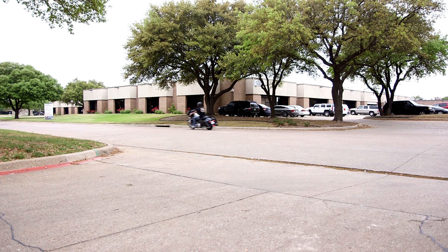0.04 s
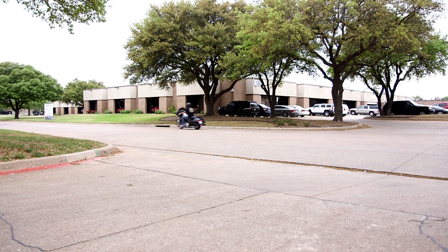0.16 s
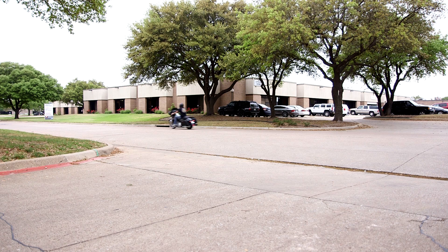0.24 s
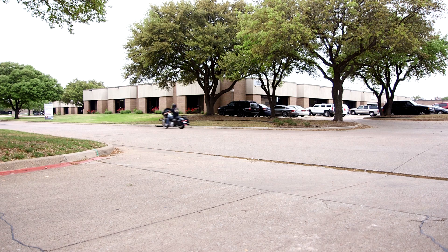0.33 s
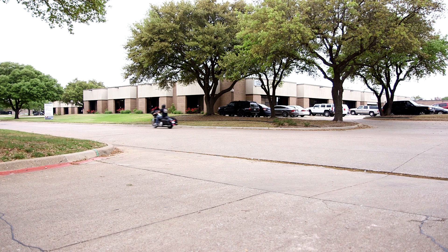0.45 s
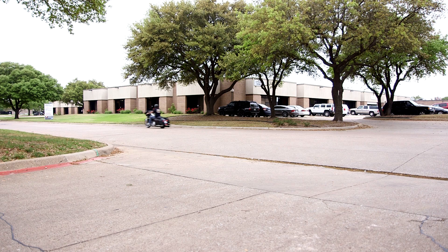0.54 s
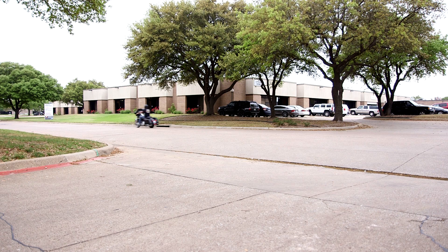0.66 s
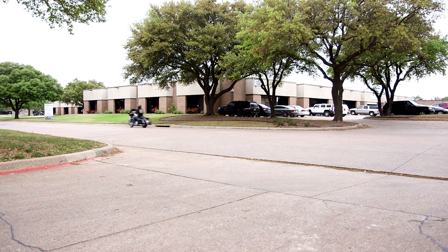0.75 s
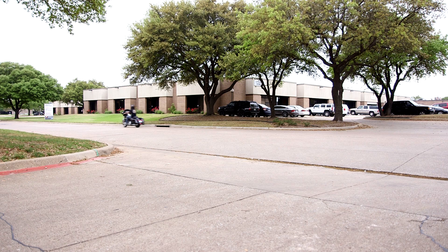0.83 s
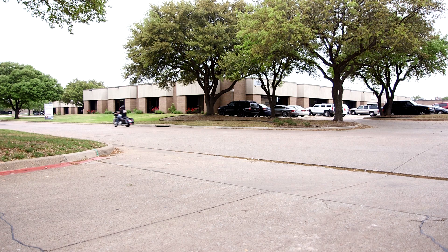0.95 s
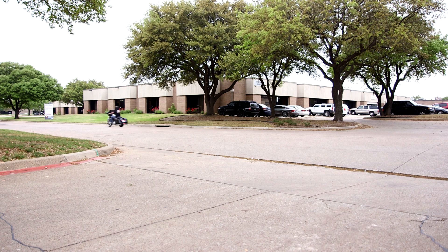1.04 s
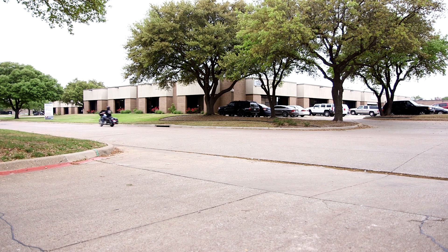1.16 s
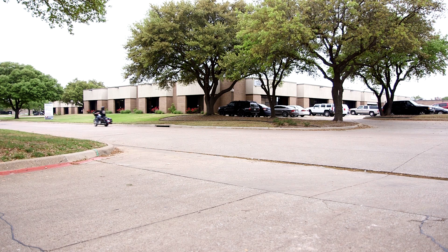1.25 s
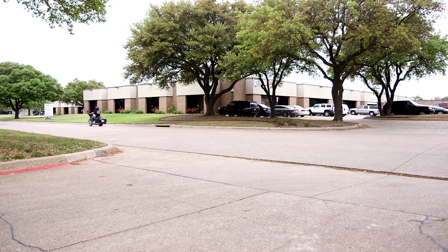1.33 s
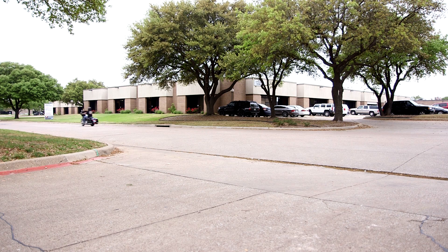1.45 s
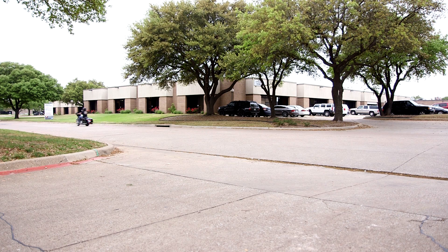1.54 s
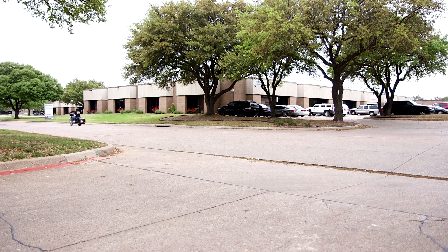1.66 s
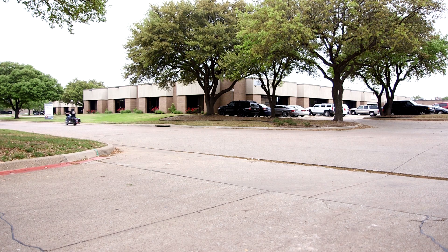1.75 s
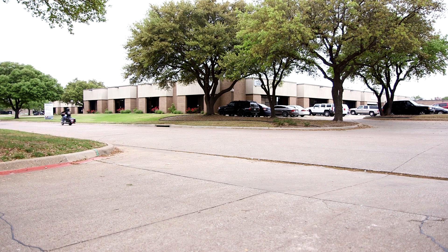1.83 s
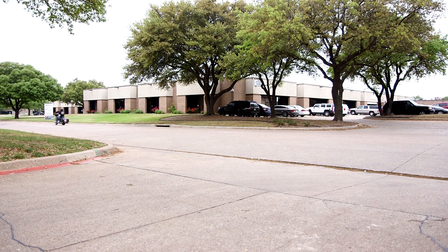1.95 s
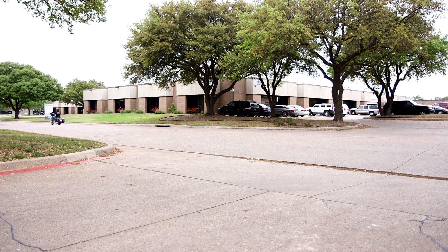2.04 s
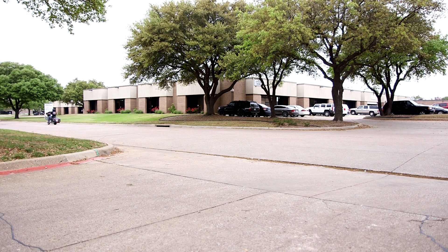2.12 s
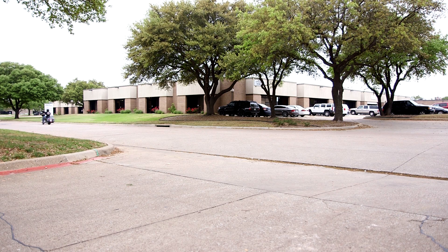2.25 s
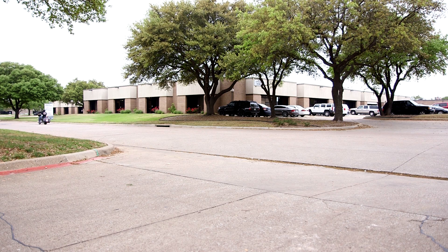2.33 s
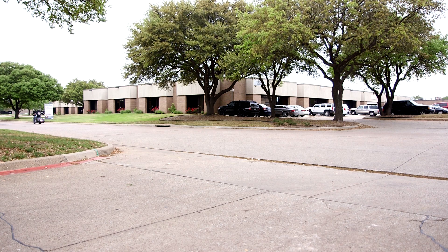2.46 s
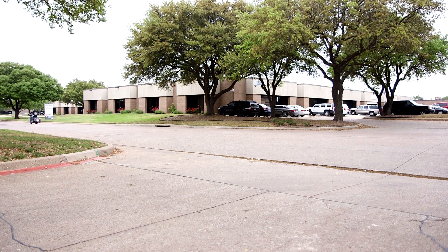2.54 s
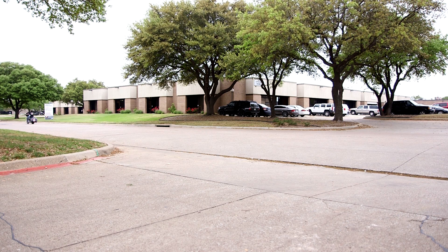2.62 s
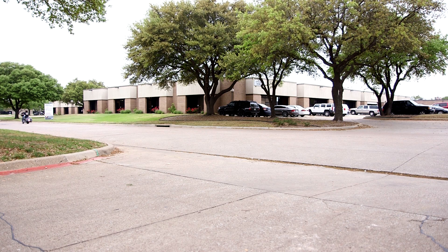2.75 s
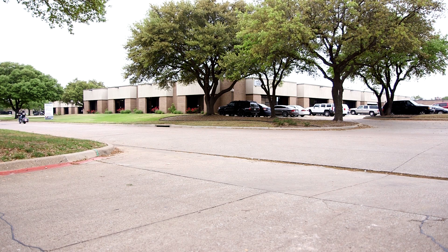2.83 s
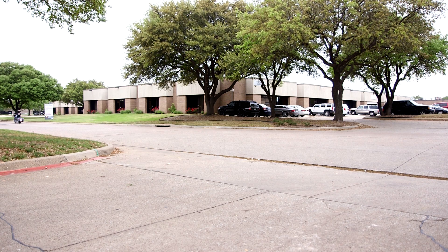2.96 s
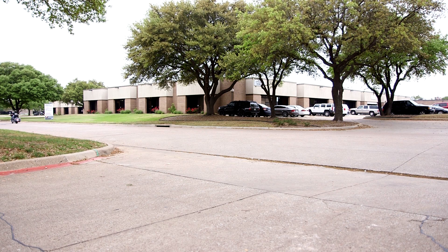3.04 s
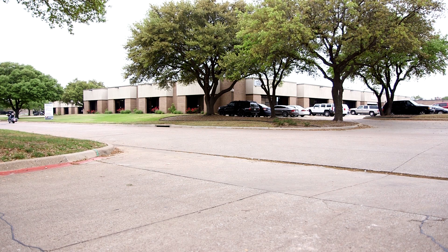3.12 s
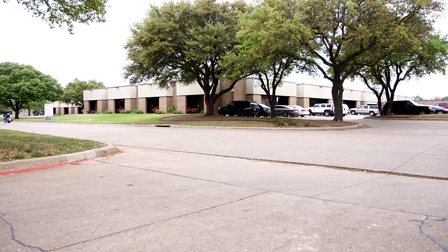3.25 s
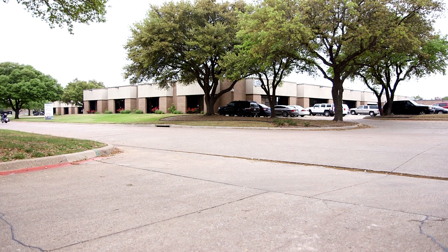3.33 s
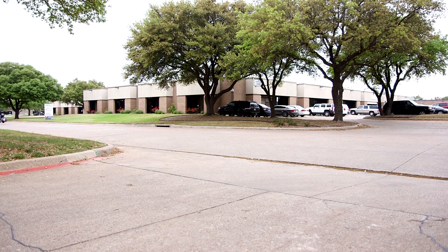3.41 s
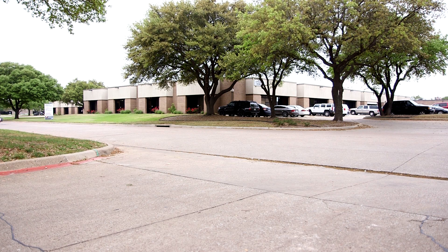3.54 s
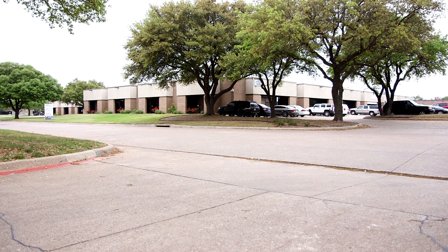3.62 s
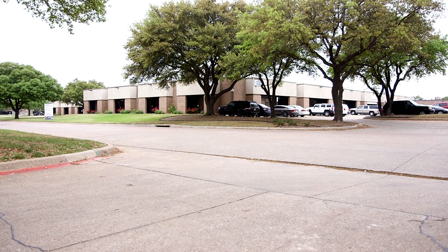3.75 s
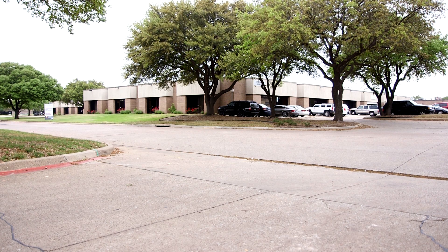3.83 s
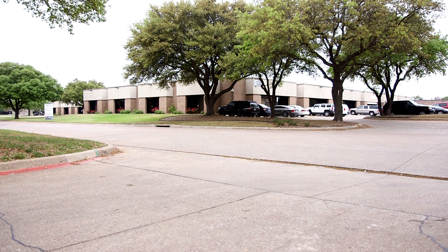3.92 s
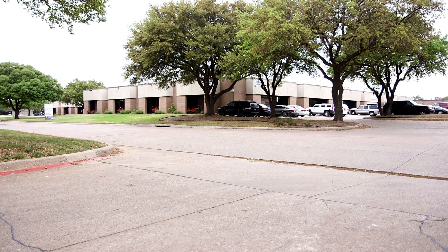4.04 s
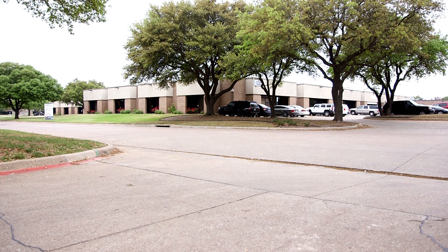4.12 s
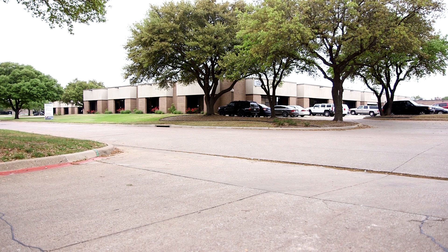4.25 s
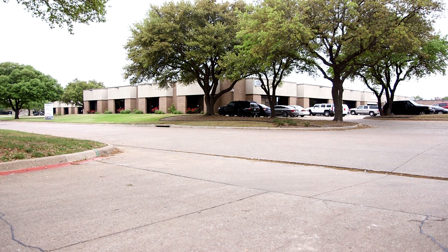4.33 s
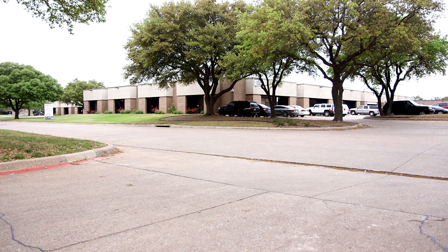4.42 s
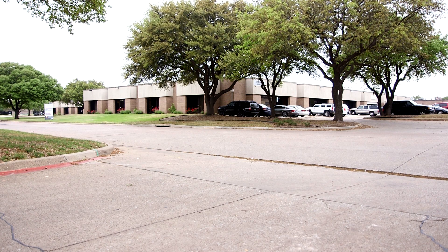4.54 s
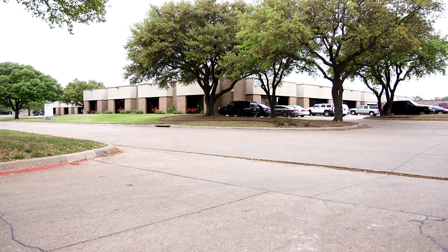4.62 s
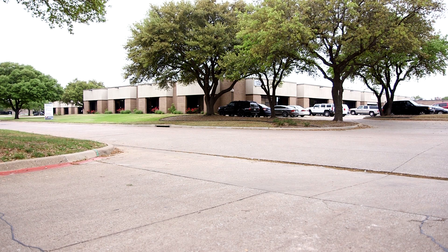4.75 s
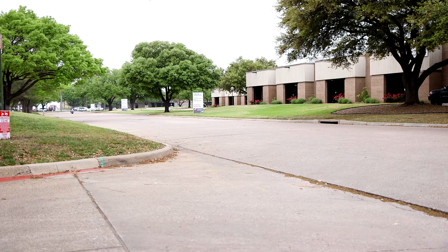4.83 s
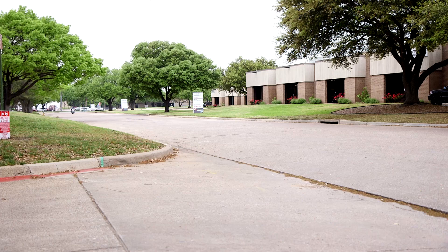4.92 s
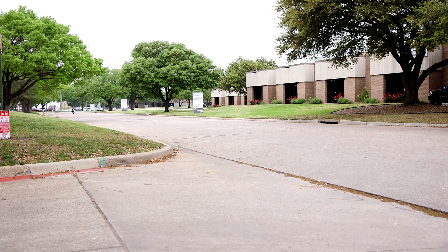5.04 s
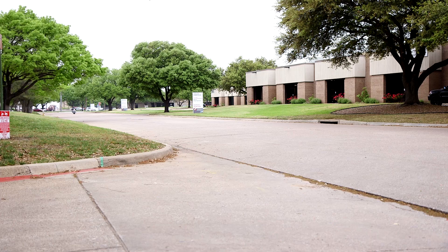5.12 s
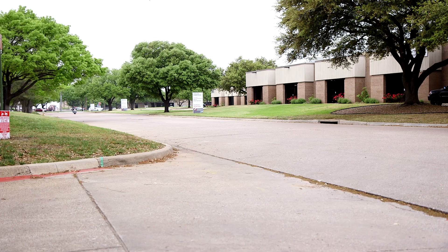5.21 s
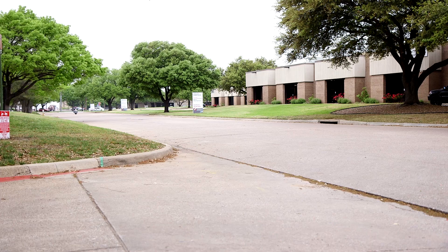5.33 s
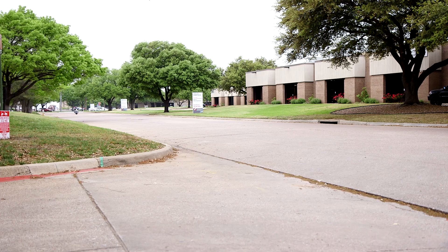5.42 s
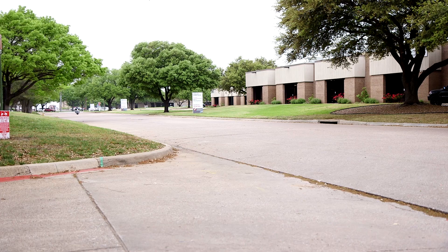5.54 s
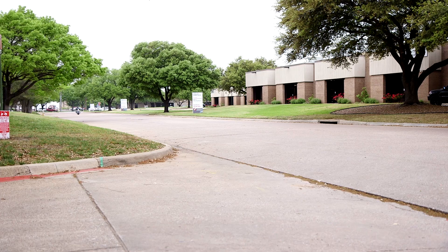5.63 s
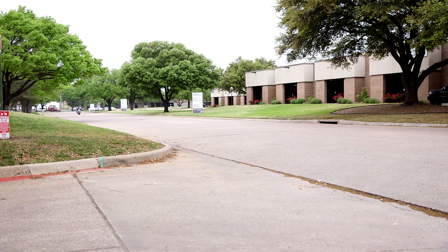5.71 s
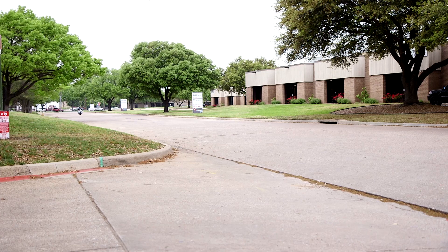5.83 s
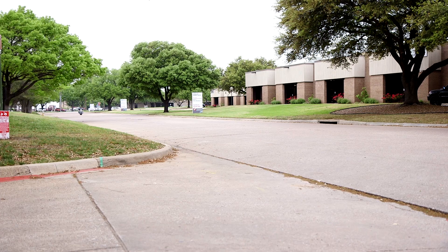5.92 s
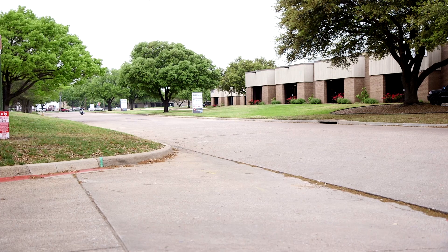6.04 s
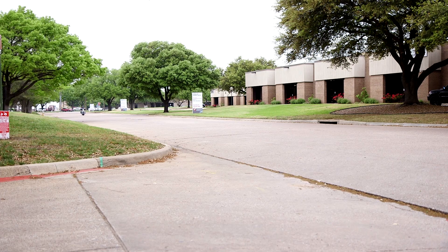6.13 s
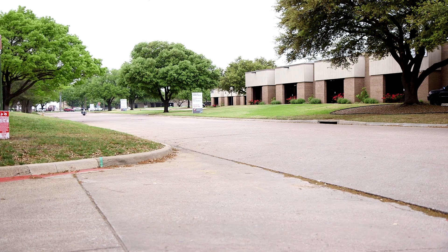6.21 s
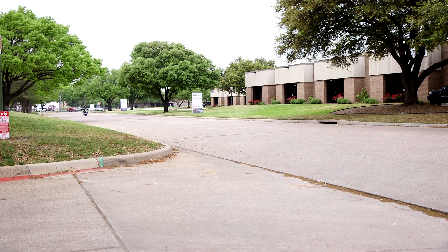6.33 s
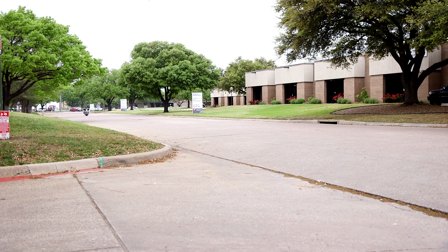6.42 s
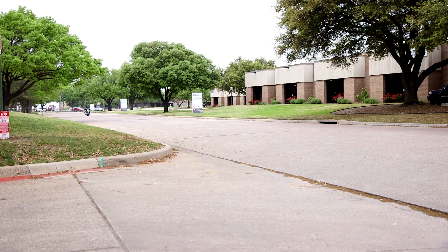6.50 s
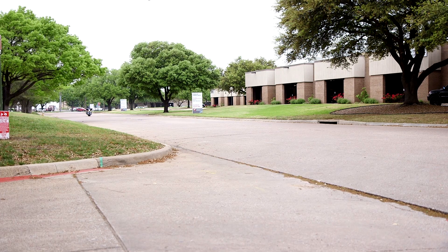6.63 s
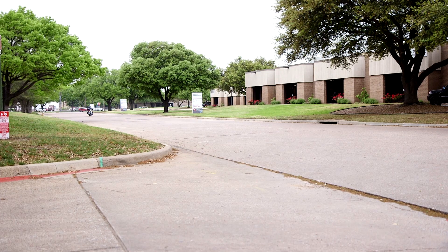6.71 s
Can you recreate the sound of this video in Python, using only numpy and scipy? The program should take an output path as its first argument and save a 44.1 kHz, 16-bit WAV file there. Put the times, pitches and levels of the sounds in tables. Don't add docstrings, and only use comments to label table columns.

```python
import sys
import numpy as np
from scipy import signal
from scipy.fft import rfft, irfft
from scipy.io import wavfile
from scipy.ndimage import uniform_filter1d

SR = 44100
rng = np.random.default_rng(int(sys.argv[2]) if len(sys.argv) > 2 else 0)


def linear_from_db(decibels):
    return 10 ** (np.asarray(decibels, float) / 20)


def output_pcm(signal):
    pcm = np.clip(np.atleast_2d(signal).T, -1, 1) * 32767
    wavfile.write(sys.argv[1], SR, np.round(pcm).astype(np.int16))


N = 298557
STEP = 8
SECOND_FIRING = 315 / 720

# (time [s], second over first firing [0-1], dulling [dB/octave])
TWIN = [(0, 0.27, 1.5), (1.5, 0.51, 3), (2, 0.6, 0), (3.8, 0.48, -0.5), (4.2, 0.64, -0.5), (4.9, 0.4, -0.5),
        (5.1, 0.04, 2), (6, 1, 4.5), (6.77, 0.5, 3.5)]


def unit(x):
    return x / np.sqrt(np.mean(x ** 2) + 1e-20)


def in_time(rows):
    s, *columns = np.transpose(rows)
    return [np.interp(np.arange(N) / SR, s, c) for c in columns]


def at_hz(points, hz):
    points_hz, points_db = np.array(points)[:, 0], np.array(points)[:, 1]
    return np.interp(np.log(hz), np.log(points_hz), points_db)


def wander(hz):
    knots = rng.standard_normal(int(N / SR * hz) + 2)
    at_knot = np.arange(0, N, STEP) / SR * hz
    return uniform_filter1d(np.interp(at_knot, np.arange(len(knots)), knots), size=200)


def even(x):
    power = uniform_filter1d(uniform_filter1d(x ** 2, size=5000), size=5000)
    return x / np.sqrt(power + 1e-20)


def resonate(x, modes):
    out = 0
    for k, (hz, width_hz, db) in enumerate(modes):
        r = np.exp(-np.pi * width_hz / SR)
        poles = [1, -2 * r * np.cos(2 * np.pi * hz / SR), r * r]
        zeros = [(1 - r * r) / 2, 0, (r * r - 1) / 2]
        out = out + (-1) ** k * linear_from_db(db) * signal.lfilter(zeros, poles, x + 1e-18)
    return out


def cut(x, hz, kind, order):
    return signal.sosfilt(signal.butter(order, min(hz, .45 * SR), kind, fs=SR, output="sos"), x)


def decay(x, t60_s):
    return signal.lfilter([1], [1, -linear_from_db(-60 / (t60_s * SR))], x)


def echoes(x, wet_db, dull_hz):
    t60_s, gap_s = 0.64, .012
    s = np.arange(SR) / SR
    tail = rng.standard_normal(SR) * linear_from_db(-60 * s / t60_s) * (s > gap_s)
    tail = cut(tail / np.sqrt(np.sum(tail ** 2)), dull_hz, "low", order=1)
    return x + linear_from_db(wet_db) * signal.fftconvolve(x, tail)[:N]


def firings(cycle, lag):
    turns = np.arange(-1, int(cycle[-1]) + 1)[:, None] + [0, SECOND_FIRING] + lag
    at = np.interp(turns.ravel(), cycle, np.arange(N), left=-1, right=-1).astype(int)
    return at[at >= 0]


def clicks(at, sizes):
    out = np.zeros(N)
    out[at] = sizes
    return out


def strengths(cycle, mouth_db):
    # (time [s], peak [dB])
    hard = [(0.0618, -32), (0.1301, -24.5), (0.178, -21), (0.2034, -21), (0.2249, -20), (0.2713, -14),
            (0.3177, -17.5), (0.4529, -26), (1.7509, -26), (1.8023, -30), (1.914, -24), (1.9679, -32),
            (2.0737, -35), (2.3346, -26), (2.3855, -24), (2.4139, -25), (2.5356, -26), (2.585, -21),
            (2.8689, -26), (2.9143, -20), (2.9856, -22), (3.0305, -23), (3.0749, -21), (3.0939, -23)]
    over_mouth_db = 12
    at = firings(cycle, lag=0.)
    strength_db = 1.1 * rng.standard_normal(400)
    for s, peak_db in hard:
        k = np.argmin(abs(at - s * SR))
        strength_db[k] = np.clip(peak_db - mouth_db[at[k]] - over_mouth_db, 1, 5)
    return linear_from_db(strength_db)


def twin_db(k, share):
    pair = abs(1 + share * np.exp(-2j * np.pi * k * SECOND_FIRING))
    return 20 * np.log10(pair / np.sqrt(1 + share ** 2))


def swell_db(k):
    # (time [s], multiple [-], half length [s], level [dB])
    main_rows = [(0.0, 4, 0.84, -5), (0.55, 7, 0.25, -2.5), (0.75, 9, 1, -1), (1.15, 7, 0.3, -2.5),
                 (1.5, 9, 0.15, -35), (2.4, 7, 0.2, 7), (2.5, 4, 0.099, -13), (3.05, 4, 0.15, -12),
                 (3.1, 7, 0.26, -6.5), (3.15, 5, 1, 0.8), (3.2, 9, 0.12, -20), (3.55, 4, 0.25, -6),
                 (3.8, 4, 0.17, 2), (5.8, 4, 0.15, -10.5), (6.0, 5, 0.37, 3.5), (6.1, 7, 0.15, -21)]
    # (time [s], multiple [-], half length [s], level
    # [dB])
    further_rows = [(0.1, 21, 0.32, 1), (0.1, 22, 0.53, -17), (0.5, 3, 0.57, -16), (0.5, 6, 0.67, -11),
                    (0.6, 18, 0.28, -17), (0.7, 20, 0.13, 17), (0.8, 4, 1, 0), (0.9, 11, 0.88, -7),
                    (0.9, 12, 0.3, 4.5), (1.0, 19, 0.3, -12), (1.5, 13, 0.19, -14), (1.6, 14, 0.72, -10.3),
                    (1.8, 6, 0.39, -12), (1.9, 11, 0.71, -17), (2.0, 10, 0.29, 14), (2.1, 12, 0.31, 9.5),
                    (2.4, 15, 0.7, 9), (2.7, 8, 0.4, 8.5), (3.0, 10, 0.28, 9), (3.2, 11, 0.4, 4.5),
                    (3.3, 16, 0.72, -3.5), (3.5, 6, 0.61, -10.8), (3.6, 10, 0.35, -11.0),
                    (3.7, 13, 0.74, -12.1), (3.8, 4, 0.17, -6), (5.5, 13, 0.68, -16),
                    (.05, 21, 0.24, -6), (2.15, 21, 0.23, 4.5), (2.22, 5, 0.13, -3.5), (2.45, 45, .15, 10.5),
                (4.45, 12, 0.068, 7.5), (4.55, 5, .1, -1.5), (4.78, 9, 0.037, 8), (4.78, 12, 0.1, 11),
                (4.8, 5, 0.053, -1), (5.35, 5, 0.24, -6), (5.3, 18, 0.44, -8), (5.3, 19, 0.41, -0.5),
                (5.2, 12, 0.24, -2.5), (6.4, 5, 0.089, -10), (6.4, 19, .5, -4)]
    s = np.arange(0, N, STEP) / SR
    rows = main_rows + further_rows
    return sum(db * np.exp(-((s - at) / half) ** 2) for at, which, half, db in rows if round(which) == k)


def pipe_tones(cycle, per_s, load_db, growl_db, muffler_db, loose):
    # (multiple [-], level under load [dB])
    strong = [(4, -2.5), (5, -2), (7, -8), (9, -13)]
    # (multiple [-], level under growl [dB])
    minor = [(2, -37), (3, -9.5), (6, -2), (8, -6), (10, -11.5), (11, -8.5), (12, -12), (13, -7.5),
             (14, -15), (15, -14), (16, -14), (17, -20), (18, -24), (19, -18.5), (20, -31.5)]
    # (frequency [Hz], level [dB])
    pipe_curve = [(75, -7.5), (92, -3), (110, -0.5), (125, -2.05), (145, -3), (175, 5), (200, -0.06),
                  (235, -7.5)]
    # (frequency [Hz], level [dB])
    growl_curve = [(120, -2.5), (250, 1), (340, -2.5), (402, 2), (460, -1.5), (580, 5)]
    # (frequency [Hz], level [dB])
    muffler_curve = [(370, -1), (405, 3.5), (450, -7), (540, -18), (650, -6.5), (720, -12.5), (800, -21.5),
                     (900, -9), (1050, -16), (1250, -20)]
    controls = (cycle, per_s, load_db, growl_db, muffler_db, loose)
    cycle, per_s, load_db, growl_db, muffler_db, loose = (c[::STEP] for c in controls)
    share, dulling_db = (c[::STEP] for c in in_time(TWIN))
    share = np.clip(share, 0, .95)
    steady_db = load_db + 0.33 * loose
    levels = [(round(k), steady_db + db + at_hz(pipe_curve, round(k) * per_s)) for k, db in strong]
    for k, db in minor:
        k = round(k)
        colour_db = at_hz(growl_curve, k * per_s) - dulling_db * np.log2(k * per_s / 250)
        levels += [(k, growl_db + db + twin_db(k, share) + colour_db + 2.2 * wander(2.5))]
    for k in range(21, 48):
        colour_db = at_hz(muffler_curve, k * per_s) - 2.5
        levels += [(k, muffler_db + twin_db(k, share) + colour_db + 4 * wander(3.8))]
    out = 0
    for k, db in levels:
        pair = np.angle(1 + .9 * np.exp(-2j * np.pi * k * SECOND_FIRING))
        slip = .75 * wander(1.2) + .012 * k * wander(4) + .06 * k * loose * wander(14)
        ring = -2.45 - 1.2 * np.arctan((k * per_s - 98) / 12) - .02 * k * k
        tone = np.cos(2 * np.pi * k * cycle + pair + ring + slip)
        out = out + np.sqrt(2) * linear_from_db(db + swell_db(k)) * tone
    return signal.resample_poly(out, STEP, 1)[:N]


def uneven_thump(cycle):
    # (frequency [Hz], width [Hz], level [dB])
    thump_modes = [(101, 25, -1.5), (150.5, 72, -5), (241.6, 104, -7.5)]
    at = firings(cycle, lag=0.0634)
    ring = resonate(clicks(at, rng.standard_normal(len(at))), thump_modes)
    ring = cut(cut(ring, 58.0, "high", order=4), 398, "low", order=2)
    return even(echoes(ring, wet_db=6.5, dull_hz=503))


def bark(cycle):
    # (frequency [Hz], width [Hz], level [dB])
    bark_modes = [(417, 107, -3.5), (631, 157, -3.5), (894, 150, -4)]
    at = firings(cycle, lag=.03)
    hits = clicks(at, linear_from_db(0.83 * rng.standard_normal(len(at))))
    puff = (unit(decay(hits, 0.061)) + .6) * rng.standard_normal(N)
    ring = cut(resonate(puff, bark_modes), 260, "high", order=4)
    return even(echoes(ring, wet_db=1.5, dull_hz=1480))


def burst(cycle, modes, sharp_db, strength, t60_s, colour_db):
    at = firings(cycle, lag=0.)
    gate = decay(decay(clicks(at, strength[:len(at)]), t60_s), .004)
    latest = np.searchsorted(at, np.arange(N), "right") - 1
    bursts = 0
    for mode in modes:
        patch_db = 0.98 * wander(4.96)[at // STEP]
        colour = linear_from_db(patch_db + colour_db * rng.standard_normal(len(at)))[latest]
        bursts = bursts + resonate(unit(gate * colour * rng.standard_normal(N)), [mode])
    hiss = resonate(rng.standard_normal(N), modes)
    return even(echoes(linear_from_db(sharp_db) * bursts + hiss, wet_db=-6.5, dull_hz=9100))


def rasp(cycle, sharp_db, strength):
    # (frequency [Hz], width [Hz], level [dB])
    rasp_modes = [(1070, 476, 1.5), (1930, 670, -1.5), (2960, 460, -6)]
    return burst(cycle, rasp_modes, sharp_db + 2.5, strength, t60_s=0.049, colour_db=0.5)


def crack(cycle, sharp_db, strength):
    # (frequency [Hz], width [Hz], level [dB])
    crack_modes = [(3900, 490, 9.5), (4650, 1130, 10), (6100, 280, 1)]
    ring = burst(cycle, crack_modes, sharp_db + 5.5, strength, t60_s=.022, colour_db=3.5)
    return cut(ring, 1800, "high", order=2)


def sizzle(cycle, sharp_db, strength):
    # (frequency [Hz], width [Hz], level [dB])
    sizzle_modes = [(6570, 1600, 4.5), (10100, 3500, 0.5), (12400, 3200, 0)]
    ring = burst(cycle, sizzle_modes, sharp_db - 1.5, strength, t60_s=.024, colour_db=4.5)
    return cut(ring, 6000, "high", order=2)


def header(cycle, mouth_db, strength):
    # (frequency [Hz], width [Hz], level [dB])
    header_modes = [(1980, 310, 6), (3040, 1100, -1.5)]
    from_s, to_s, turn_s = 2.51, 4.0, 0.1
    s = np.arange(N) / SR
    facing = np.clip(np.minimum(s - from_s, to_s - s) / turn_s, 0, 1)
    ring = burst(cycle, header_modes, 7., strength, t60_s=.022, colour_db=2.8)
    return linear_from_db(mouth_db - 10 + 12.5 * facing) * ring


def street():
    # (frequency [Hz], level [dB per Hz])
    street_curve = [(350, -23), (600, -24), (697, 2), (1250, -2.5), (1810, -0.5), (2400, -5.5),
                    (4620, -9.5), (9760, -32), (15500, -54.5)]
    shape_db = at_hz(street_curve, np.fft.rfftfreq(N, 1 / SR) + 1)
    return linear_from_db(-51.5) * unit(irfft(rfft(rng.standard_normal(N)) * linear_from_db(shape_db), N))


def wind():
    lumps = linear_from_db(2.5 * unit(cut(rng.standard_normal(N), 4, "low", order=2)))
    rumble = cut(cut(rng.standard_normal(N), 62, "low", order=4), 38, "high", order=4)
    return linear_from_db(-42.0) * unit(lumps * rumble)


def pops():
    # (time [s], peak [dB])
    pop_events = [(1.323, -3.5), (1.369, -9), (1.457, -8), (1.61, -10), (3.986, -11.5), (4.038, -13.5),
                  (4.139, -17), (4.242, -16), (4.349, -15), (4.392, -13), (4.62, -24), (4.703, -32),
                  (4.958, -20)]
    s, peak_db = np.transpose(pop_events)
    one = resonate(clicks([0], [1]), [(120, 100, -1.0), (208, 69, -6.5)])[:4000]
    one = cut(one, 250, "low", order=2)
    pushes = clicks(((s + 0.00582) * SR).astype(int), linear_from_db(peak_db - 3.0))
    return signal.fftconvolve(pushes, one / one.max())[:N]


def scene():
    # (time [s], four-stroke cycles [1/s])
    speed = [(0.0, 20.53), (0.6, 22.85), (1.25, 25.06), (1.32, 22.36), (1.5, 21.08), (1.58, 17.1),
             (1.7, 18.39), (1.95, 18.4), (2.45, 19.91), (3.4, 24.02), (3.87, 25.19), (4.3, 18.92),
             (4.95, 19.79), (4.97, 28.54), (5.3, 28.6), (5.7, 29.15), (5.95, 28.79), (6.77, 28.28)]
    # (time [s], load [dB], nearness [dB], pipe mouth [dB])
    ride = [(0.0, -15.5, -33, -43.5), (0.15, -14, -31.5, -38.5), (0.8, -16, -30, -41.5),
            (1.47, -18.5, -35, -40.5), (1.58, -23.5, -41.5, -48), (1.72, -18, -38.5, -45),
            (2.28, -21.5, -44, -48), (2.65, -19, -42.5, -46), (3.15, -16, -45, -44.5),
            (3.4, -19.5, -44.5, -51), (3.85, -20.5, -43.5, -54), (3.95, -27, -49, -60),
            (4.3, -30, -53, -65), (4.45, -25.0, -48.5, -56), (5.1, -27, -46, -64), (5.55, -27, -44, -62),
            (5.72, -20.2, -44.5, -58.5), (6.77, -23, -45.5, -57)]
    # (time [s], looseness [-])
    looseness = [(0, .2), (1.22, .2), (1.3, 1.3), (1.9, 1.3), (2.05, .3), (3.85, .25), (3.92, 2.2),
                 (4.3, 2.2), (4.45, 1), (5, 1.3), (5.2, .75), (6.77, .7)]
    # (time [s], sharpness [dB])
    sharpness = [(0, -4), (1.3, -7), (1.6, -2), (2.4, 2), (3.1, -6.5), (3.3, -6.5), (3.9, -13),
                 (4.95, -8.5), (5.1, -23)]
    per_s, = in_time(speed)
    cycle = -.287 + np.cumsum(per_s) / SR
    load_db, near_db, mouth_db = in_time(ride)
    loose, = in_time(looseness)
    sharp_db, = in_time(sharpness)
    _, dulling_db = in_time(TWIN)

    growl_db = load_db + 0.43 * (near_db - load_db) + 0.5 - 0.47 * dulling_db
    muffler_db = near_db + 0.35 * (near_db + 34) + 1.0 - 2.8 * dulling_db
    uneven_db = load_db - 15.5 + 8 * np.minimum(loose, 1.3)
    crack_db = mouth_db + 1.2 - .8 * dulling_db
    sizzle_db = crack_db - 4.5 - 1.17 * dulling_db
    strength = strengths(cycle, mouth_db)

    bike = pipe_tones(cycle, per_s, load_db, growl_db, muffler_db, loose)
    bike += linear_from_db(uneven_db) * uneven_thump(cycle)
    bike += linear_from_db(near_db - 3.5) * bark(cycle)
    bike += linear_from_db(near_db - 5) * rasp(cycle, sharp_db, strength)
    bike += linear_from_db(crack_db) * crack(cycle, sharp_db, strength)
    bike += linear_from_db(sizzle_db) * sizzle(cycle, sharp_db, strength)
    bike += header(cycle, mouth_db, strength)
    bike += pops()
    return (bike + street() + wind())[None]


def low_pass(x):
    return signal.sosfilt(signal.butter(12, 15710, fs=SR, output="sos"), x)


def record(dry):
    return low_pass(cut(dry, 11400, "low", order=2))


dry = scene()
out = record(dry)
output_pcm(out)
```